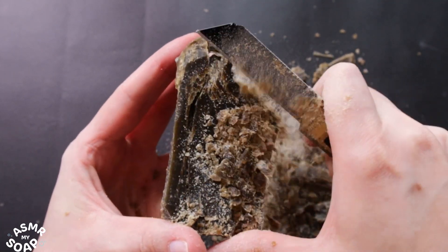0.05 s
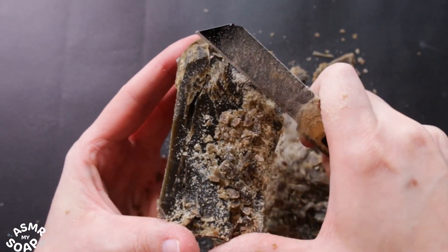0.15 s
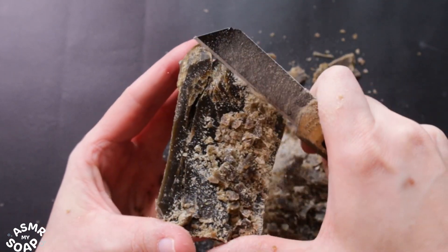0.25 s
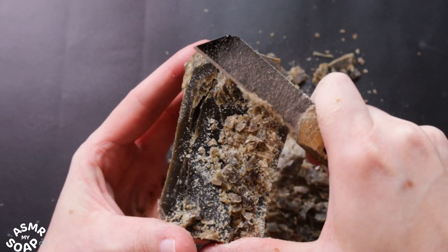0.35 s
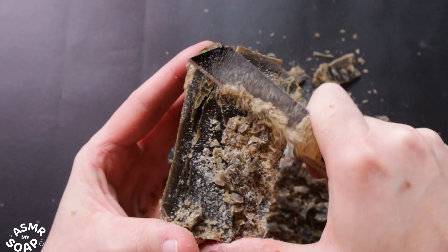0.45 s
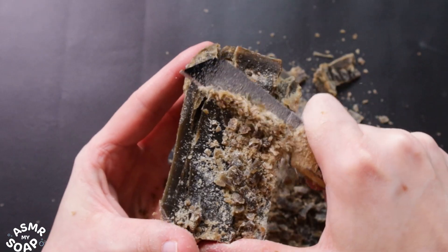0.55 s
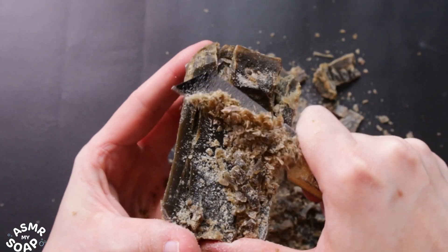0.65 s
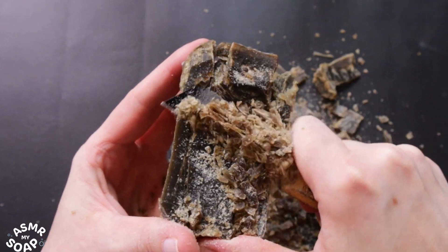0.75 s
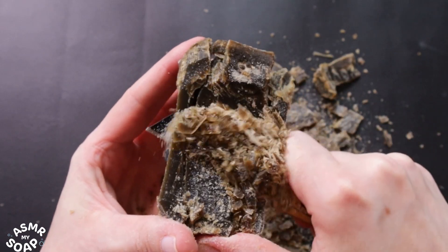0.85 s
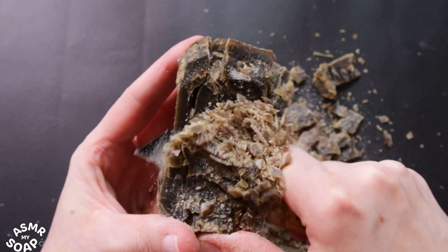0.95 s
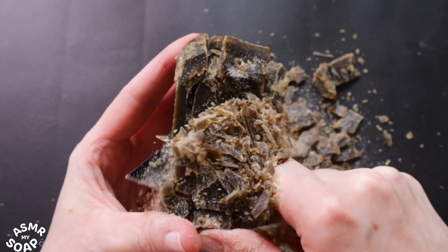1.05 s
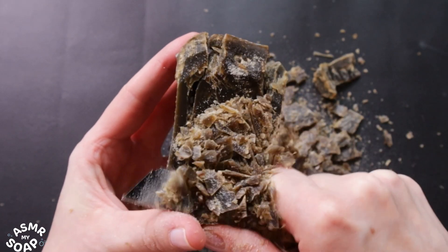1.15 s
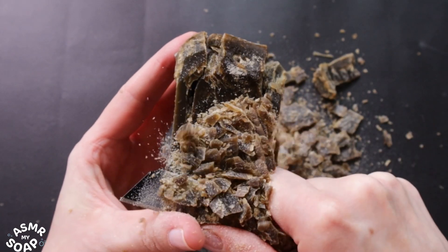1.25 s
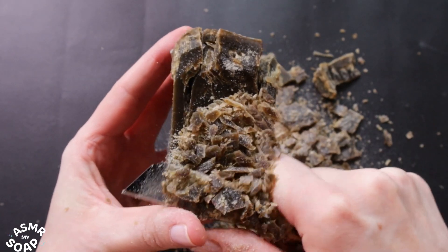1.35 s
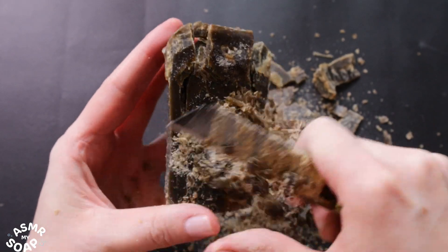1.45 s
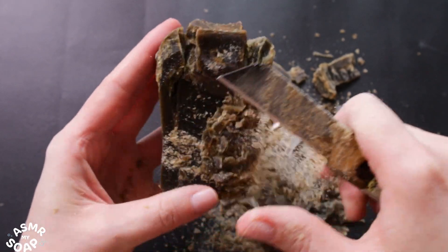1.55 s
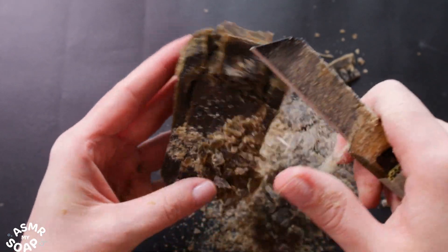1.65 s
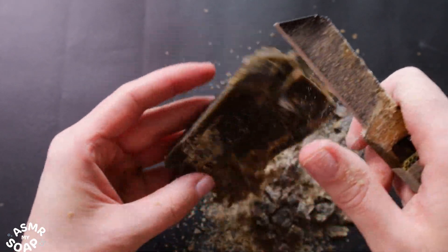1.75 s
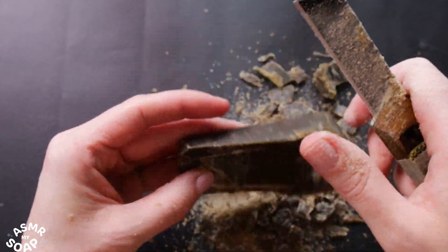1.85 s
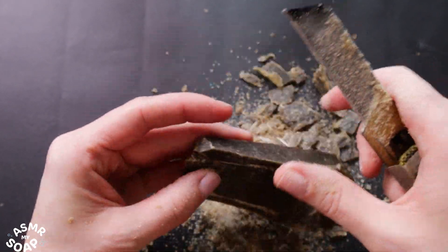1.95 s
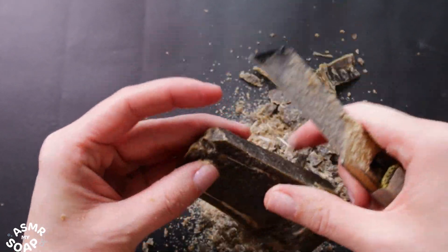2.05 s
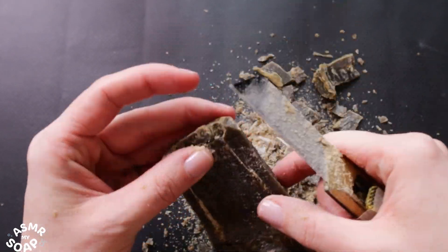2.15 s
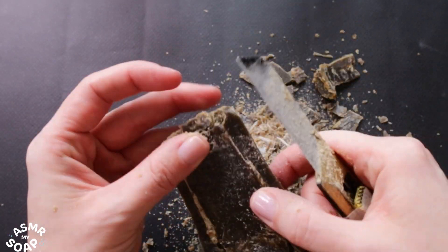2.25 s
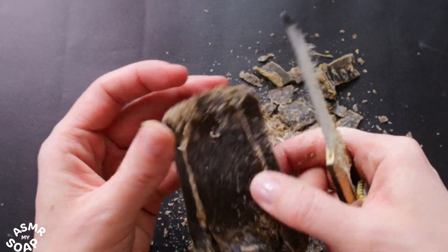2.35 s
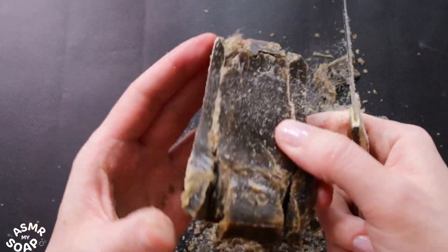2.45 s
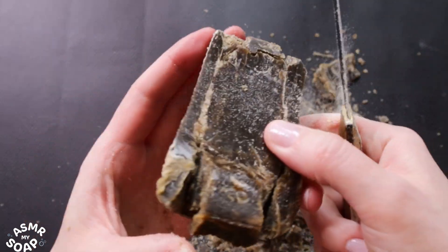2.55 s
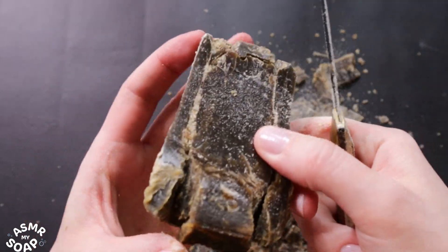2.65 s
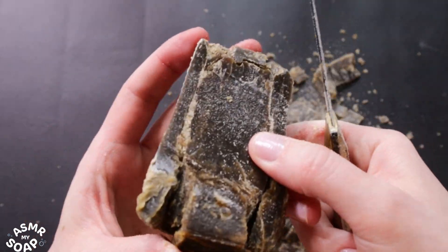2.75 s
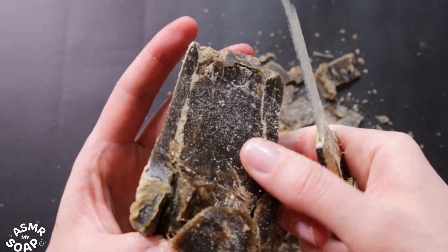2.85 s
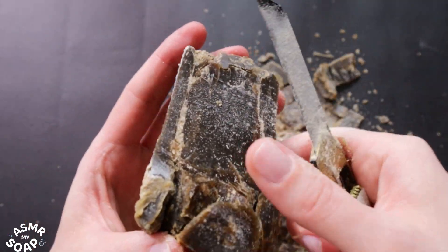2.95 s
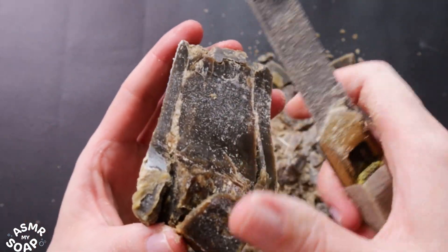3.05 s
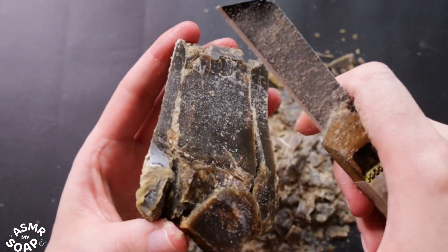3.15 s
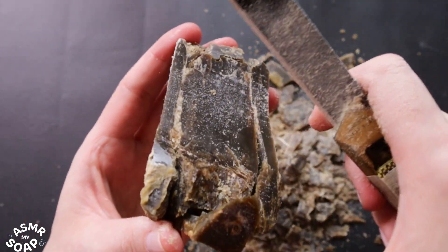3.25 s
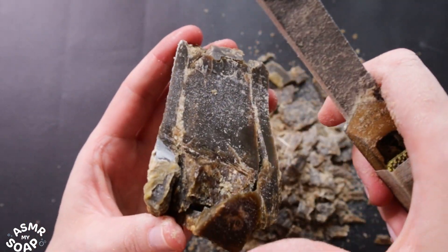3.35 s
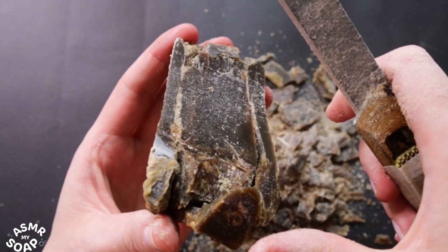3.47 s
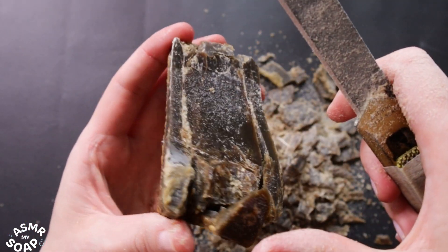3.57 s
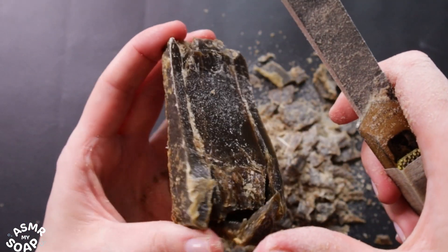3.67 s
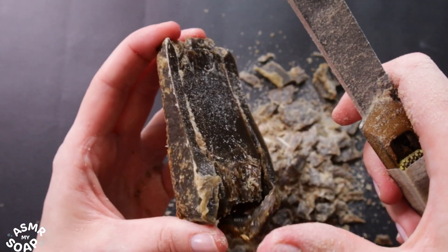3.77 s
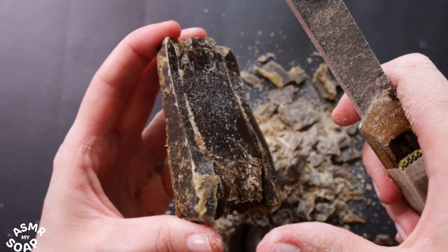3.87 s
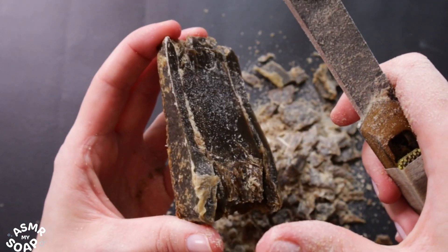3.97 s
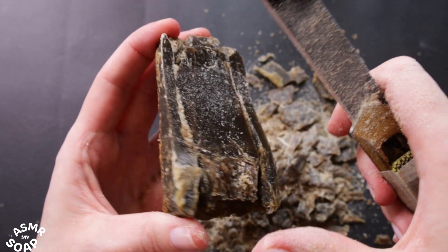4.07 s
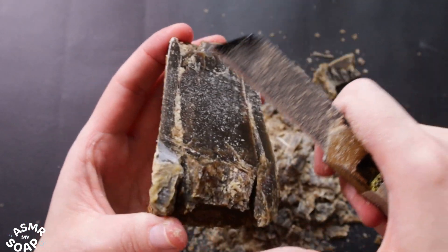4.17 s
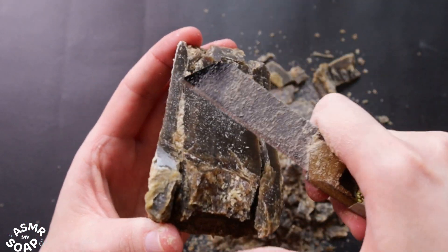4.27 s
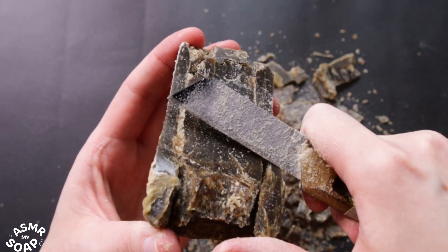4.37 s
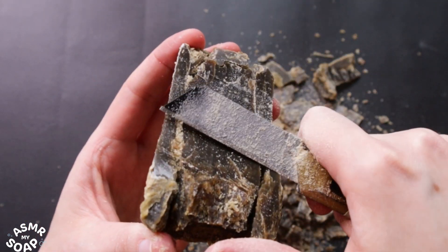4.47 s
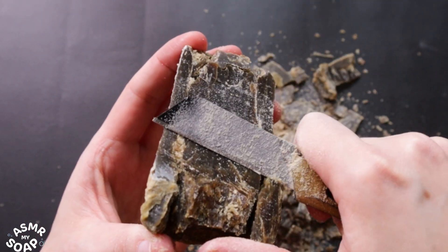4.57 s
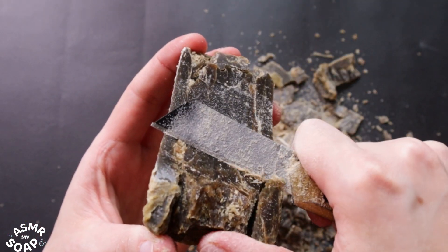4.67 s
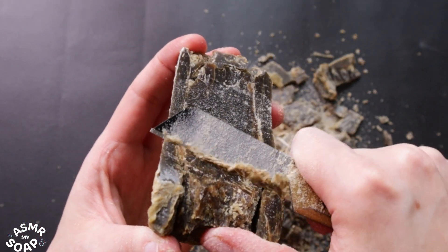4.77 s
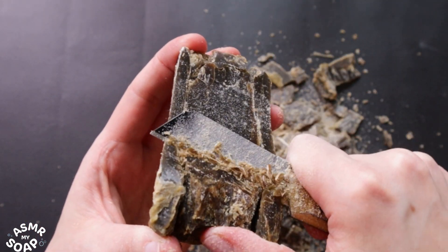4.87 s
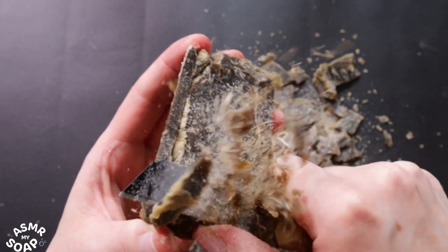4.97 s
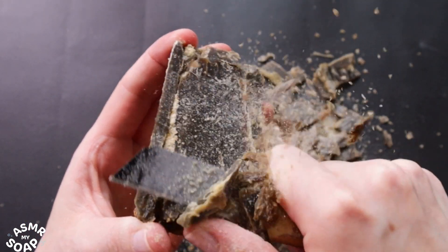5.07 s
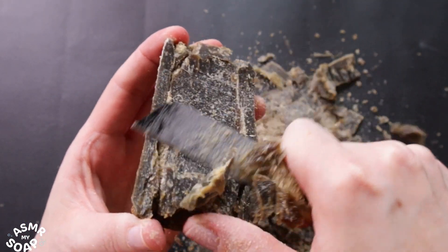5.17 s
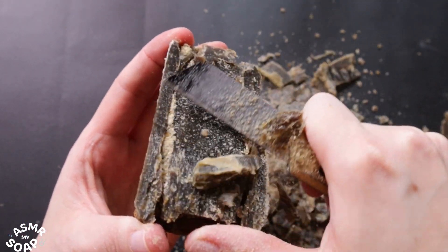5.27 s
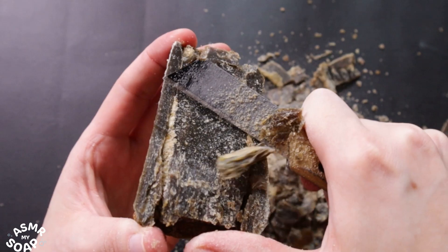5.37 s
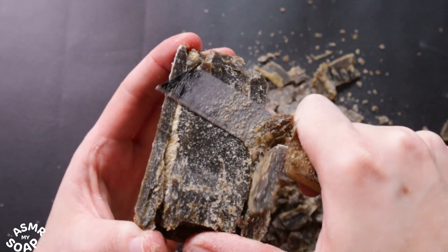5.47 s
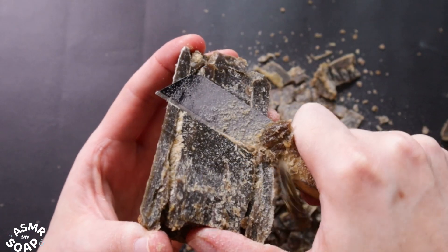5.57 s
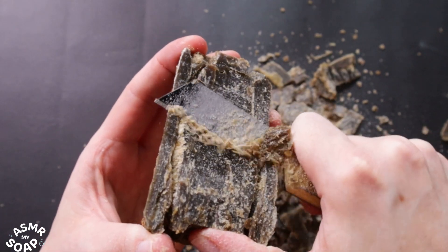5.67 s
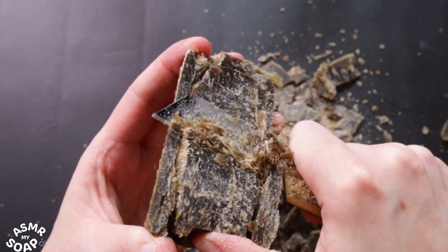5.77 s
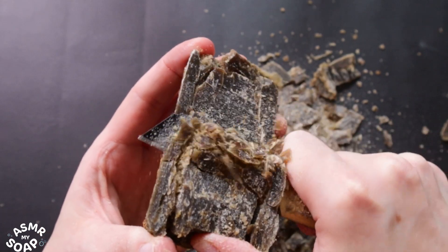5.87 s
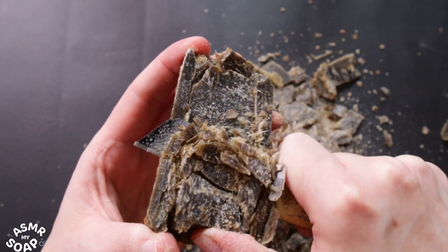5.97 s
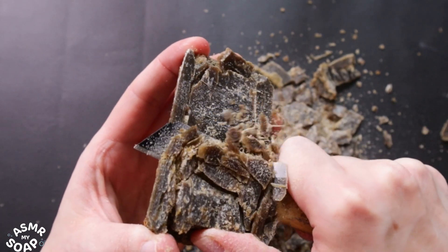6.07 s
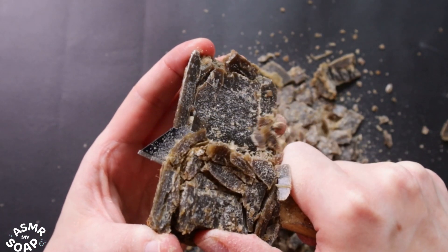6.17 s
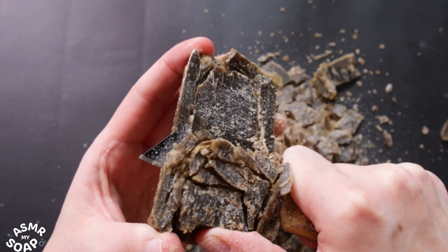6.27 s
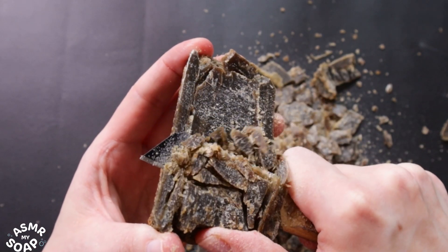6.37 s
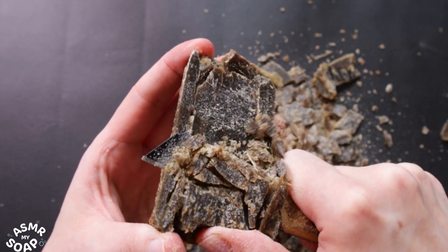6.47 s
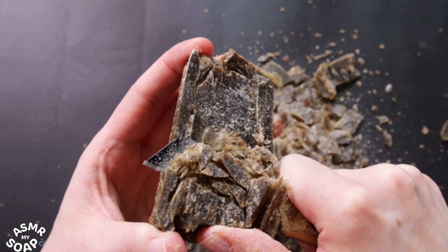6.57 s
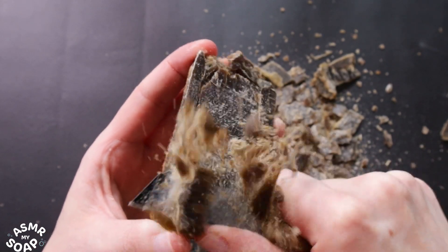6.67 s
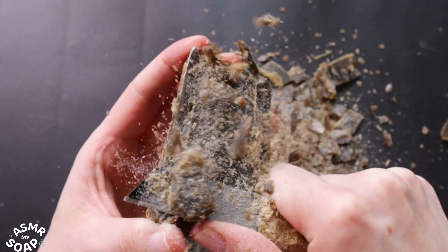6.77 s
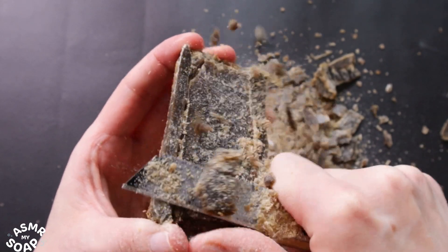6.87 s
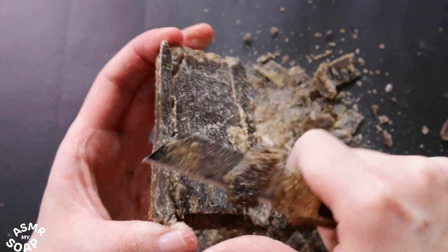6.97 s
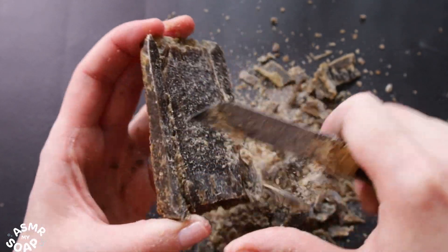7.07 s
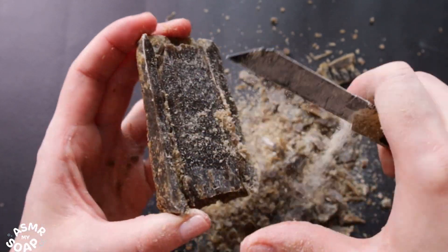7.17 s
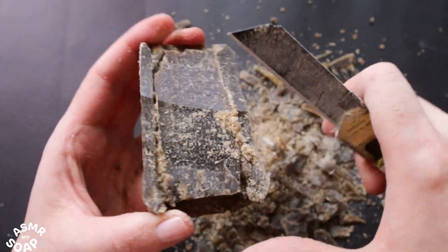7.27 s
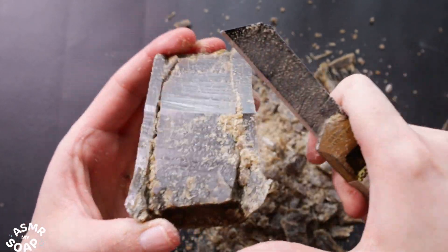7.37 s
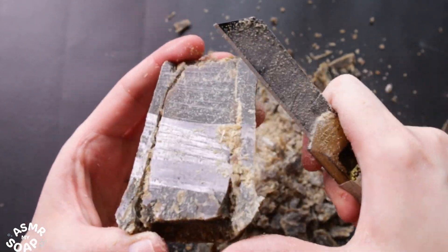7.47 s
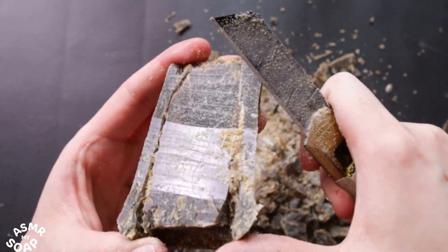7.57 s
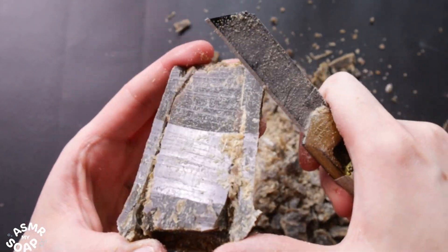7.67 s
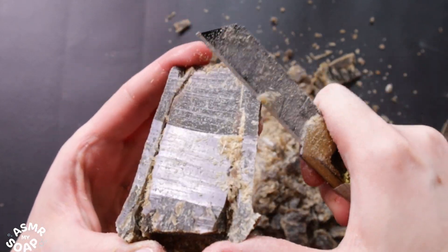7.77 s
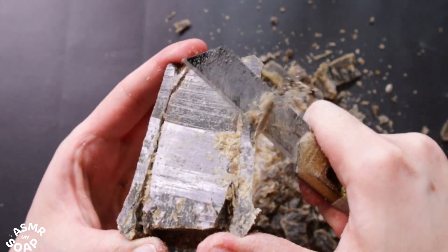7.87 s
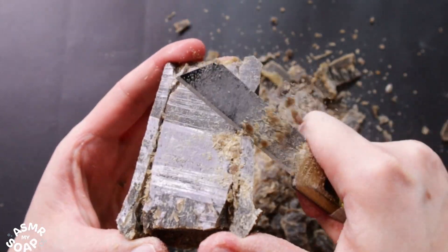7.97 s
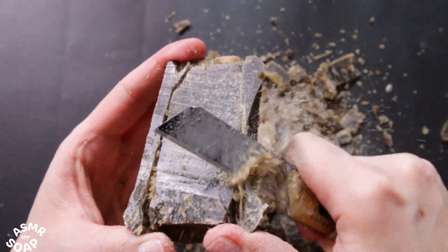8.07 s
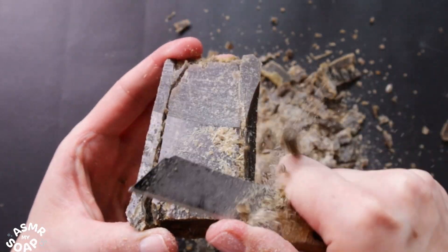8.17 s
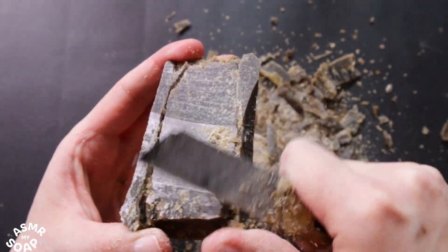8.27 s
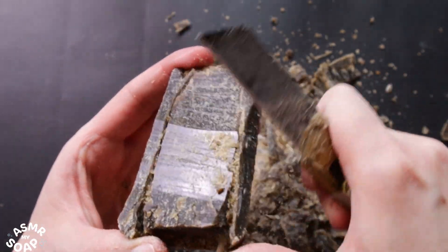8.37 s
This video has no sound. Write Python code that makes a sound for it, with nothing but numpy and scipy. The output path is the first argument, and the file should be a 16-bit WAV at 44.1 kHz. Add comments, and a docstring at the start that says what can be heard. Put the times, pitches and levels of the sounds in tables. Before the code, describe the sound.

A blade crunches and scrapes through dry, cracked soap close up, with brittle snaps and crumbs pattering onto a hollow table.

```python
"""A steel blade pushed through a dry, cracked bar of soap, close in front of a stereo microphone.
The soap snaps in short brittle cracks over a fine crunch of micro-fractures; the edge skids in brief rasps.
Lumps and crumbs fall on the hollow table top just below and ring its modes; the hands shake table and
microphone stand. Behind it all, a quiet room hums and adds short, dull reflections."""
import sys
import numpy as np
from scipy import signal
from scipy.io import wavfile
from scipy.ndimage import uniform_filter1d

SR = 44100
rng = np.random.default_rng(int(sys.argv[2]) if len(sys.argv) > 2 else 0)


def master(y):
    """Save y as 16-bit WAV."""
    cut = np.clip(np.atleast_2d(y).T, -1, 1)
    pcm = np.round(cut * 32767)  # scale
    wavfile.write(sys.argv[1], SR, pcm.astype(np.int16))


N = 371322
HOP = 64   # samples between points of a level curve


def from_db(db):
    """Decibels to gain."""
    return 10 ** (np.asarray(db) / 20)


def rms_one(x):
    """Scale to rms 1."""
    return x / np.sqrt(np.mean(x ** 2) + 1e-20)


def loudest_rms(x):
    """Rms over the loudest two milliseconds."""
    return np.sqrt(uniform_filter1d(x ** 2, size=88).max())


def at_hz(points, hz):
    """Read a spectrum table on a log-frequency axis."""
    points_hz, values = np.transpose(points)
    return np.interp(np.log(hz), np.log(points_hz), values)


def band(x, low_hz, high_hz):
    """Butterworth band-pass."""
    sos = signal.butter(2, [low_hz, min(high_hz, .45 * SR)], "band", fs=SR, output="sos")
    return signal.sosfilt(sos, x)


def resonance(x, hz, width_hz):
    """Two-pole resonance with gain 1 at its peak."""
    r = np.exp(-np.pi * width_hz / SR)
    gain = (1 - r * r) / 2
    return signal.lfilter([gain, 0, -gain], [1, -2 * r * np.cos(2 * np.pi * hz / SR), r * r], x)


def panned(x, left_db):
    """Place a sound between the two capsules."""
    return np.array([x * from_db(left_db / 2), x * from_db(-left_db / 2)])


def drift(per_s):
    """Random values joined by straight lines."""
    knots = rng.standard_normal(int(N / SR * 100) + 2)
    return np.interp(np.arange(N) / SR * per_s, np.arange(len(knots)), knots)


def grains(per_s, spread_db):
    """Random clicks of very uneven size, each with its own place left to right."""
    sizes = from_db(spread_db * np.minimum(rng.exponential(1, N), 4)) * rng.choice([-1, 1], N)
    clicks = sizes * (rng.random(N) < per_s / SR) + 1e-18
    return panned(clicks, 1.8 + 1.5 * rng.standard_normal(N))


def swell(start_s, hold_s, rise_db_per_s, fall_db_per_s):
    """One power curve per event, 1 while it holds."""
    t = np.arange(0, N + HOP, HOP) / SR - np.reshape(start_s, (-1, 1))
    late = np.maximum(t - np.reshape(hold_s, (-1, 1)), 0)
    return from_db(rise_db_per_s * np.minimum(t, 0) - fall_db_per_s * late) ** 2


def total_db(levels_db, swells):
    """Level of all events together, at every sample."""
    power = from_db(levels_db) ** 2 @ swells + 1e-11
    return np.interp(np.arange(N) / HOP, np.arange(len(power)), 10 * np.log10(power))


# the room's hum at the microphone: (frequency [Hz], relative density [dB])
HUM_SPECTRUM = [(15, -33), (25, -9.5), (112, -21), (135, -16), (213, -4), (286, -19.5), (529, -14.5),
                (655, -27), (749, -19.5), (1460, -27), (3350, -27), (3730, -28), (15000, -32.5)]
# how alike the two capsules hear it: (frequency [Hz], correlation [0-1])
HUM_LIKENESS = [(60, 1), (240, 0.74), (950, 0.16), (3770, 0.087), (15000, 0.1)]


def room_tone(level_db=-63):
    """The quiet room all around: third-octave bands of noise, left and right more alike in the bass."""
    out, edges = 0, 25 * 2 ** np.arange(0, 9.5, 1 / 3)
    white = rng.standard_normal((2, 2, N))
    for k, (low, high) in enumerate(zip(edges, edges[1:])):
        mid, side = band(white[k % 2], low, high)
        hz = np.sqrt(low * high)
        alike = at_hz(HUM_LIKENESS, hz)
        stereo = np.sqrt(1 + alike) * mid + np.sqrt(1 - alike) * side * [[1], [-1]]
        out = out + from_db(at_hz(HUM_SPECTRUM, hz)) * stereo
    return from_db(level_db) * rms_one(out)


def reflections(x, level_db=-21, t60_s=.073, wall_cut_hz=4100):
    """The walls return a dulled, decaying tail to each capsule, 3 ms behind the direct sound."""
    t = np.arange(SR // 2) / SR
    shared, own = rng.standard_normal(len(t)), rng.standard_normal((2, len(t)))
    tail = (shared + 1.8 * own) * from_db(-60 * t / t60_s) * (t > .003)
    dull = np.exp(-2 * np.pi * wall_cut_hz / SR)
    tail = signal.lfilter([1 - dull], [1, -dull], tail)
    tail /= np.sqrt(np.sum(tail ** 2) / 2)
    return from_db(level_db) * signal.fftconvolve(x.mean(axis=0, keepdims=True), tail, axes=1)[:, :N]


def stand_rumble(level_db):
    """Shaking of the table and the microphone stand: a low rumble, nearly centred."""
    mid, side = band(rng.standard_normal((2, N)), 38, 120)
    return from_db(level_db) * rms_one(mid + .085 * side * [[1], [-1]])


# modes of the hollow table top: (frequency [Hz], relative level [dB], t60 [s])
TOP_MODES = [(63, -16, 0.67), (114, -27.5, .2), (234, -33.5, 0.48), (305, -22, 0.36), (333, -4, 0.1),
             (385, 2, 0.038), (477, -12.5, 0.12), (545, -2.5, 0.038), (634, -13.5, 0.071),
             (729.5, -1, 0.037), (890, 0, 0.019), (992, -5, 0.032), (1184, -9.5, 0.057),
             (1790, -8.5, 0.074)]
# lumps landing just below the soap: (time [s], relative level [dB], pitch [Hz])
LUMPS = [(0.012, -23.5, 520), (0.077, -25.5, 503), (0.146, -13, 633), (0.207, -34.5, 464),
         (0.4683, -52, 720), (0.5541, -28.5, 700), (0.965, -53, 920), (1.0497, -36, 610), (1.068, -40, 840),
         (1.0905, -28, 920), (1.257, -33.5, 885), (1.345, -39, 360), (1.579, -23.5, 890),
         (1.6028, -28, 523), (1.6419, -31, 443), (1.7055, -27, 350), (1.87, -40.5, 380), (1.9176, -32, 504),
         (2.055, -42, 480), (4.0508, 1, 424), (4.1112, -14.5, 416), (4.1293, -38, 430), (5.005, -55, 740),
         (5.0215, -36, 1070), (5.2319, -16, 664), (5.255, -39, 620), (5.273, -24.5, 700),
         (5.3116, -21, 700), (5.4142, -25.5, 445), (5.47, -32, 480), (5.4842, -36.5, 460),
         (5.7863, -19, 500), (5.9024, -32, 570), (6.1991, -41.5, 335), (6.23, -44, 400), (6.315, -46, 340),
         (6.437, -43, 350), (6.49, -43.5, 400), (6.721, -32.5, 570), (6.9176, -24.5, 720),
         (7.0073, -14, 740), (7.052, -21.5, 480), (7.105, -28, 690), (7.2427, -20, 477), (8.3019, -27, 670)]


def table_top(patter_db, scatter_db=1.8, rattle_t60_s=.15):
    """Lumps strike the top's modes, most those near their own pitch; crumbs patter on it at random."""
    blows, rattle_hits = np.zeros((len(TOP_MODES), N)), np.zeros(N)
    chance = rng.standard_normal((len(LUMPS), len(TOP_MODES)))
    hz, mode_db, t60 = np.transpose(TOP_MODES)
    for (s, lump_db, pitch_hz), luck in zip(LUMPS, chance):
        octaves_off = np.abs(np.log2(hz / pitch_hz))
        blows[:, round(s * SR)] += from_db(lump_db - 10.5 + scatter_db * luck - 6.7 * octaves_off)
        rattle_hits[round(s * SR)] = from_db(lump_db - 27)
    patter = grains(390, spread_db=4)[0]
    dealt = rng.integers(0, 3, N)   # each crumb finds a third of the modes
    knocks, crumbs = 0, 0
    for k in range(len(TOP_MODES)):
        r, w = from_db(-60 / (t60[k] * SR)), 2 * np.pi * hz[k] / SR
        shape = (-1) ** (k // 3) * from_db(mode_db[k])   # a blow pushes some modes, pulls others
        forces = np.array([blows[k], patter * (dealt == k % 3)]) + 1e-18
        knock, crumb = signal.lfilter([0, shape * np.sin(w)], [1, -2 * r * np.cos(w), r * r], forces)
        place = 2.6 + 8.2 * (-1) ** k   # each mode radiates from its own part of the top
        knocks += panned(knock, place)
        crumbs += panned(crumb, place)
    # countless high modes and jumping crumbs: noise that dies after each blow
    decay = signal.lfilter([1], [1, -from_db(-60 / (rattle_t60_s * SR))], rattle_hits)
    rattle = decay * rms_one(band(rng.standard_normal(N), 470, 5500))
    return knocks + panned(rattle, 1.5) + from_db(patter_db) * rms_one(band(crumbs, 200, 1500))


# resonances of blade and bar: (frequency [Hz], width [Hz], relative level [dB])
BAR_MODES = [(1270, 500, 3), (1620, 180, -2), (2200, 3600, -3.5), (3300, 960, 2.5), (4300, 230, 6),
             (5300, 840, 6), (6100, 320, 5), (7000, 700, -13.5)]


def crunch(crunch_db, pitch_hz, body_db, dust_db):
    """Clumps of micro-fractures ring the bar, most near the breaking piece's pitch; dust fizzes above."""
    clumps = from_db(3.6 * drift(per_s=80))
    fractures = clumps * grains(1500, spread_db=4)
    dealt = rng.integers(0, 3, N)   # each fracture finds a third of the resonances
    body, middle = .25 * band(fractures, 900, 2800), .1 * band(fractures, 2800, 8000)
    for k, (hz, width_hz, level_db) in enumerate(BAR_MODES):
        ring = (-1) ** k * from_db(level_db) * resonance(fractures * (dealt == k % 3), hz, width_hz)
        if hz < 2700:
            body += ring
        else:
            middle += ring * from_db(-12 * np.abs(np.log2(hz / pitch_hz)))
    dust = band(clumps * grains(1000, spread_db=2), 6800, 18000)
    return (from_db(body_db) * rms_one(body) + from_db(crunch_db) * rms_one(middle)
            + from_db(dust_db) * rms_one(dust))


# crumbs sliding off onto the table: (time [s], hold [s], dust [dB], patter [dB])
CRUMB_SHOWERS = [(0, 0.3, -51.5, -51.5), (.2, 0.19, -61.5, -72), (1.31, 0.11, -54, -59.5),
                 (1.467, 0.15, -56.5, -68), (1.572, 0.076, -44.5, -49), (1.795, .06, -55.5, -61.5),
                 (2.047, 0.017, -65, -69), (2.19, 0.051, -66.5, -77), (1.863, 0.1, -50, -54),
                 (2.59, 0.18, -63.5, -71.5), (3.125, 0.068, -61.5, -76.5), (3.37, .05, -76.5, -73),
                 (4.074, 0.011, -56.5, -45.5), (5.004, 0.036, -43.5, -67), (5.215, 0.034, -43, -72),
                 (5.234, 0.057, -38, -44), (5.42, .02, -59, -57), (5.462, 0.012, -57, -50),
                 (5.53, .02, -60, -63), (5.786, 0.047, -46.5, -49.5), (5.874, .08, -57, -54),
                 (6.276, 0.19, -57, -62.5), (6.743, 0.026, -43, -51), (6.917, 0.048, -42, -45),
                 (6.992, 0.053, -37, -41), (7.256, 0.016, -53.5, -54), (7.7, 0.043, -62, -73)]
# the blade pushed through the bar, close to the microphone:
# (time [s], hold [s], crunch [dB], pitch [Hz], body relative to crunch [dB], table shake [dB])
BLADE_PUSHES = [(0.391, 0.04, -51.5, 4094, -9, -72), (0.456, 0.25, -49, 5900, -7, -62),
                (0.652, .24, -47.5, 5500, -1.5, -59.5), (0.933, 0.24, -43, 5200, -6.5, -54),
                (1.245, 0.034, -49, 5000, -11, -55.5), (2.878, .05, -63, 4500, -0.5, -69),
                (4.634, 0.11, -67.5, 4704, -6.5, -71), (4.774, .15, -59.5, 6200, -12, -71),
                (5.0, 0.1, -52, 4820, -16, -54), (5.107, .05, -52.5, 4410, -7, -62),
                (5.556, .13, -58, 5900, -4.5, -63), (5.899, 0.061, -50.5, 5970, -4, -53.5),
                (6.04, 0.053, -50, 5170, -17, -58.5), (6.183, 0.19, -57.5, 6200, -10, -64),
                (6.607, .03, -55, 5000, -5, -63), (6.751, 0.014, -41, 3800, -3.5, -47.5),
                (6.877, .07, -50, 4785, -3.5, -56.5), (6.97, 0.17, -43.5, 5200, -14, -57.5),
                (7.67, 0.037, -63, 4290, -5, -71), (7.814, .08, -59.5, 4300, -7.5, -63),
                (7.919, 0.12, -52.5, 3100, -7.5, -56.5), (8.129, 0.06, -47.5, 3400, -11, -53.5),
                (8.232, 0.025, -40.5, 3544, -10.5, -53), (8.378, .05, -48, 4580, -16, -58)]


def crumbling(resting_shake_db=-65.5):
    """Pushes and showers drive crunch and patter. Also returns the shake [dB] from hands and lumps."""
    push_s, push_hold, push_db, push_hz, below_db, push_shake_db = np.transpose(BLADE_PUSHES)
    fall_s, fall_hold, fall_dust_db, fall_patter_db = np.transpose(CRUMB_SHOWERS)
    lump_s, lump_db, _ = np.transpose(LUMPS)
    pushes = swell(push_s, push_hold, rise_db_per_s=700, fall_db_per_s=216.5)
    showers = swell(fall_s, fall_hold, rise_db_per_s=1505, fall_db_per_s=109.5)
    jolts = swell(lump_s, 0, rise_db_per_s=6000, fall_db_per_s=74)
    events = np.r_[pushes, showers]
    event_db = np.r_[push_db, fall_dust_db - 6.5]
    event_hz = np.r_[push_hz, np.full(len(fall_s), 5000)]
    loudest = np.argmax(from_db(event_db)[:, None] ** 2 * events, axis=0)
    pitch_hz = event_hz[loudest].repeat(HOP)[:N]
    body_db = total_db(np.r_[push_db + below_db, fall_dust_db - 10.5], events)
    dust_db = total_db(np.r_[push_db - 3.5, fall_dust_db], events)
    patter_db = total_db(np.r_[push_db - 16.5, fall_patter_db], events)
    shakes = np.r_[pushes, jolts, np.ones_like(pushes[:1])]
    shake_db = total_db(np.r_[push_shake_db, lump_db - 33.5, resting_shake_db], shakes)
    return crunch(total_db(event_db, events), pitch_hz, body_db, dust_db) + table_top(patter_db), shake_db


# the edge skidding over the bar: (time [s], length [s], level [dB], start pitch [Hz], end pitch [Hz])
EDGE_SKIDS = [(0.409, 0.014, -47.5, 4000, 4230), (0.435, 0.024, -53, 2400, 2300),
              (0.463, 0.071, -44.5, 2250, 2200), (0.565, 0.077, -44, 2200, 2200),
              (1.249, 0.021, -38.5, 5300, 3700), (2.896, 0.023, -67, 4400, 4400),
              (3.291, 0.039, -58, 2740, 3000), (4.628, 0.02, -61, 5060, 4870),
              (4.664, 0.0095, -60, 3160, 3200), (4.731, 0.02, -57.5, 3020, 3050),
              (4.79, 0.012, -48.5, 6100, 6100), (4.839, 0.017, -51, 6100, 6100),
              (4.86, .02, -57, 6100, 6100), (4.885, 0.024, -43, 6100, 6100),
              (5.019, 0.014, -18.5, 5960, 4430), (5.741, 0.03, -52, 5900, 6300),
              (5.897, 0.029, -44, 6100, 6100), (5.952, 0.033, -41, 6100, 6100),
              (6.046, 0.026, -41.5, 4300, 4300), (6.744, 0.022, -26.5, 3860, 4540),
              (7.656, 0.088, -57.5, 4190, 4200), (7.866, 0.01, -46.5, 4300, 4360),
              (8.026, 0.038, -49, 1890, 1950), (8.099, 0.081, -37.5, 4660, 3520),
              (8.22, 0.078, -42, 3050, 3300), (8.365, 0.037, -50.5, 2710, 2720)]


def skids():
    """Dense grit under the edge rings a narrow resonance, weaker neighbours and the bar's broad body."""
    out = np.zeros((2, N))
    grit = grains(6000, spread_db=8)
    for s, length, level_db, start_hz, end_hz in EDGE_SKIDS:
        at, size = round(s * SR), round(length * SR)
        rub, progress = grit[:, at:at + size], np.linspace(0, 1, size)
        rasp = (1 - progress) * resonance(rub, start_hz, 320) + progress * resonance(rub, end_hz, 320)
        rasp -= .4 * resonance(rub, 1.5 * end_hz, 400) + .25 * resonance(rub, .55 * end_hz, 250)
        rasp += .07 * band(rub, 1500, 7000) + .08 * band(rub, 7500, 12000)
        fade = np.clip(6.5 * np.minimum(progress, 1 - progress), 0, 1)
        out[:, at:at + size] += from_db(level_db) * rms_one(rasp) * fade
    return out


# cracks of soap and ticks of crumbs, close up and mostly a little left of centre:
# (time [s], level [dB], flake pitch [Hz], edge relative to flake [dB], tearing time [ms])
SOAP_CRACKS = [(0.0162, -31.5, 9100, -8, 1.9), (.0552, -36.5, 7100, -1.5, .6), (.1244, -53.5, 9420, 12, .6),
               (0.1491, -27, 5760, -1.5, 0.98), (0.2255, -44.5, 4140, -20, 1.3),
               (.2493, -55, 10800, -6, 0.66), (.27, -44, 12200, 2, 0.81), (.4687, -28, 2260, -8, 0.63),
               (.477, -26.5, 3300, -6, 0.69), (0.5027, -37.5, 2200, -22, 0.19),
               (0.5376, -30.5, 2200, -12, 0.68), (.5561, -22, 2560, -4.5, 0.45),
               (.574, -26.5, 5500, -12, 3), (.6016, -34, 12400, -11, 3.6), (0.6278, -38, 5860, -6, 0.95),
               (0.6884, -41, 4360, 0, 0.98), (0.722, -38, 6000, -5, 1.5), (0.742, -38, 5400, -11, 4.3),
               (0.8564, -34.5, 5900, -10, 3.1), (0.884, -33.5, 5600, -8, 3.5), (0.8987, -36, 2950, -9, 3.3),
               (0.9264, -31.5, 5440, -11, 5.4), (0.939, -29, 5040, -8, 0.77),
               (0.9652, -16.5, 5800, -43, 1.9), (0.9863, -18.5, 5840, -23, 1.1),
               (1.0037, -32, 5900, -8, 7.7), (1.0195, -30, 4350, -3, 0.52), (1.035, -31, 5900, -12, .7),
               (1.0508, -18, 5300, -13, 1.8), (1.0686, -27, 5400, -13, 5.3), (1.0946, -15, 4300, -5, 3.2),
               (1.1073, -23, 4770, -15, 0.18), (1.1132, -24, 5250, -12, 1.1), (1.1264, -28, 4670, -6, 0.82),
               (1.161, -26, 5660, -14, 0.25), (1.17, -25.5, 4300, -3, 2.8),
               (1.2551, -30.5, 10200, -5, 0.82), (1.2603, -28.5, 5030, -10, 3.9),
               (1.269, -30.5, 3910, -7, 2.8), (1.2803, -36, 4000, -9, 0.85), (1.343, -35, 5660, -10, 0.59),
               (1.4748, -31, 5950, -10, 0.67), (1.5239, -40, 5330, -4, 0.52), (1.582, -34, 11800, -6, 2.1),
               (1.645, -44.5, 9400, 4, 1.2), (1.678, -43.5, 4150, 0, 1.2), (1.7544, -46, 5630, 0, 1.9),
               (1.7982, -38.5, 6900, -11, .55), (1.8207, -43, 7050, 0, 0.55), (1.846, -44, 5300, -2, 1.1),
               (1.921, -29.5, 6740, -3, 0.55), (1.9674, -35, 6740, -8, 0.45),
               (1.9794, -34.5, 6900, -6, 1.1), (2.0077, -36, 7000, -7, 1.5), (2.1857, -50, 8400, 5.5, .76),
               (2.217, -51, 8750, 2, 0.41), (2.4153, -47, 3080, -9, 0.83), (2.6167, -35, 8600, -8, 0.43),
               (2.656, -55, 9990, 11.5, .37), (2.7314, -46, 8700, 16, 0.39), (2.7909, -50, 7500, 4.5, .46),
               (2.8843, -47.5, 11710, -19, .7), (2.911, -44, 4400, -8, 6), (2.977, -47, 10900, -3, 0.94),
               (3.108, -49, 9220, 4.5, .38), (3.136, -43, 11300, 0.5, 1.4), (3.174, -46.5, 11600, 3, 1.1),
               (3.3318, -49.5, 4480, -7, 1.1), (3.3946, -54, 8700, 9.5, 0.4),
               (3.44, -54.5, 9700, 6.5, 0.51), (4.0511, -22.5, 4140, -4.5, 2), (4.11, -31.5, 3360, -2, 1.8),
               (4.235, -68.5, 8980, 26.5, .47), (4.2897, -55.5, 6000, 0.5, 0.62),
               (4.4786, -49.5, 3980, -18, 1.3), (4.737, -47, 9730, -11, 5.1), (4.7968, -42, 9450, -3, 0.9),
               (4.8328, -41.5, 4780, 2, 2.6), (4.853, -51, 9500, -1, 2.5), (4.891, -39, 5600, -7, .52),
               (4.907, -45, 3300, 0, 2.2), (4.9385, -38, 5900, -8, .6), (4.9796, -46, 9650, 2, .67),
               (5.0011, -31, 4770, 5, 0.56), (5.0058, -23, 4740, -4, 4.1), (5.0272, -17, 5880, -2, 6.6),
               (5.043, -30.5, 6070, -10, 12), (5.107, -46.5, 3200, -10, 1.3), (5.1266, -37, 4600, -8, 1.3),
               (5.201, -31, 8900, 2, 0.3), (5.2167, -30, 8650, 1.5, 0.45), (5.2322, -30.5, 1490, 5, 1.1),
               (5.2642, -33.5, 8310, 5.5, 0.88), (5.274, -38, 8000, -2, .9), (5.2812, -35.5, 3730, -8, 9.5),
               (5.289, -30, 9500, -14, 0.55), (5.305, -32.5, 4060, -5, 13), (5.3125, -24, 4830, 1, 1.3),
               (5.377, -47.5, 8800, 12.5, 1.1), (5.3814, -42, 9950, 5, 0.64),
               (5.42, -47.5, 10000, 17.5, .74), (5.436, -44.5, 4100, -15, 2.3),
               (5.5825, -45.5, 3100, 1, 0.71), (5.592, -47, 3000, -5, 0.68), (5.617, -49, 3480, -9, 0.54),
               (5.6315, -42, 5300, -7, 0.95), (5.6636, -39, 5360, -7, 1.8), (5.683, -43, 3340, -8, 4.1),
               (5.7543, -40, 5950, -3, 9.4), (5.7886, -33, 9000, -6, 2.2), (5.8, -31, 5330, -6, 2.8),
               (5.8636, -42, 9990, 2, 0.58), (5.9041, -35, 6400, 6.5, 1.3), (5.928, -32.5, 5850, -20, 0.97),
               (5.9556, -32, 5900, -5.5, 4.9), (6.041, -37, 11600, -7, 0.49), (6.055, -35.5, 4500, 3, 3.3),
               (6.07, -37.5, 3200, 2, 0.66), (6.087, -43, 3030, -4, .51), (6.1504, -25, 3070, -9, 0.33),
               (6.2767, -28, 5660, -4.5, 0.37), (6.335, -45, 8500, -5, 0.68), (6.38, -28.5, 9500, -21, 1.5),
               (6.392, -39, 11300, -2, 0.66), (6.4811, -43.5, 4300, 1.5, 0.86),
               (6.5062, -49.5, 11070, 8, 0.71), (6.5645, -54, 8900, 9, 1.1), (6.6144, -33.5, 5770, 0, 1.33),
               (6.648, -53, 2800, -21, 1.3), (6.725, -45, 2600, 2, 0.33), (6.748, -26, 2940, 6.5, 5.6),
               (6.7667, -23.5, 5300, -6, .65), (6.8903, -29, 5300, -7, 1.3), (6.9155, -29.5, 5700, -3, 3.8),
               (6.9232, -31.5, 6000, -8, .45), (6.9658, -32, 4600, -5, 7.3), (6.9934, -24.5, 7900, -1, 2.1),
               (7.0083, -25.5, 2750, 3, 1.8), (7.0145, -22, 10500, -8, 0.43), (7.0232, -21, 5300, -9, 1.8),
               (7.0494, -22.5, 5100, -7.5, 2), (7.0623, -32, 5160, -2, 0.72), (7.074, -34, 10030, -6, .6),
               (7.0945, -26, 9990, 1, 1.2), (7.107, -34, 8500, -5, .98), (7.117, -35, 10120, 3, .6),
               (7.122, -27.5, 4170, -16, 0.43), (7.1296, -37, 4100, 3, 0.57), (7.1498, -39, 10290, 4, .6),
               (7.1653, -35.5, 4400, -6, .75), (7.1797, -38.5, 10120, 5.5, 0.55),
               (7.2452, -39, 8910, -10, 1.1), (7.2527, -38, 5150, -1.5, 3.9), (7.32, -49.5, 5470, 4, 0.66),
               (7.368, -59, 9100, 1.5, 0.46), (7.4266, -52.5, 9680, 17.5, 0.42),
               (7.473, -52, 5000, -5, 0.35), (7.568, -58, 5000, -6.5, 0.6), (7.6973, -44, 4310, -6, 0.48),
               (7.71, -47.5, 4200, -1, 4.5), (7.761, -41, 5860, -5, 0.66), (7.893, -44.5, 4300, -6, 3.7),
               (7.9234, -36, 2830, 0.5, 2.6), (7.9466, -44, 2630, -7.5, 2.9),
               (7.9744, -35.5, 3000, 1.5, 4.9), (8.0074, -30, 4680, -11, 6.5),
               (8.0405, -35.5, 5000, -8, 2.3), (8.11, -22, 4900, -3.5, 4), (8.1361, -35.5, 3140, -3, 2.7),
               (8.154, -39, 3470, 0, 1.5), (8.172, -37.5, 3450, -3, 2.5), (8.189, -37.5, 6000, -6, 0.91),
               (8.2282, -34, 3460, 1, 2.8), (8.2382, -26.5, 4960, -21, 0.34), (8.301, -39, 6370, 2.5, 1.5),
               (8.38, -38, 4270, -14, 6.6), (8.3908, -42, 4300, -6, 6.5)]


def cracks():
    """A crack is a burst of slips that swells and dies; it rings one flake, the bar and the blade edge."""
    size, lead = 1024, 256   # samples in all, and before the peak
    out = np.zeros((2, N + 2 * size))
    ms = (np.arange(size) - lead) / SR * 1000
    noise = rng.standard_normal((len(SOAP_CRACKS), 3, size))
    places = 1.5 + 2 * rng.standard_normal(len(SOAP_CRACKS))
    for (s, level_db, hz, edge_db, tear_ms), (slips, fizz, apart), place in zip(SOAP_CRACKS, noise, places):
        tear_ms = max(tear_ms, .2)
        # a longer tear and a lower flake reach deeper into the bar
        body_db = -15 + 2 * np.log2(tear_ms) - np.log2(hz / 5000)
        width_ms = tear_ms * np.where(ms < 0, .5, .9)
        envelope = np.exp(-(np.abs(ms) / width_ms) ** 1.1)
        envelope += .066 * np.exp(-ms / 5.8) * (ms > 0)   # loosened grit settles just after
        slips = slips * np.abs(slips) * envelope   # uneven and spiky
        flake = resonance(slips, hz, .025 * hz + 210 / tear_ms) + .29 * band(slips, .52 * hz, 1.1 * hz)
        body = band(slips, 980, 2900)
        edge = band(fizz * np.abs(fizz) * envelope, 7200, 14500)
        flake, body, edge = [part / loudest_rms(part) for part in (flake, body, edge)]
        crack = from_db(level_db) * (flake + from_db(body_db) * body + from_db(edge_db) * edge)
        # each capsule hears its own treble
        side = from_db(level_db + edge_db + 4.5) * band(apart * envelope, 7500, 16000)
        at = round(s * SR)
        out[:, at:at + size] += panned(crack, place) + side * [[1], [-1]]
    return out[:, lead:N + lead]


def scene():
    """Soap, blade and table close to the microphone, the room behind them."""
    cutting = cracks() + skids()
    debris, shake_db = crumbling()
    near = cutting + debris
    return near + reflections(near) + stand_rumble(shake_db) + room_tone()


def record(dry):
    """The microphone softens the top octave, the preamplifier rounds peaks, a steep low-pass follows."""
    roll_off_hz, ceiling, cutoff_hz = 12100, .9, 16900
    mic = signal.sosfilt(signal.butter(2, roll_off_hz, fs=SR, output="sos"), dry)
    preamp = ceiling * np.tanh(mic / ceiling)
    return signal.sosfilt(signal.cheby2(12, 70, cutoff_hz, fs=SR, output="sos"), preamp)


dry = scene()
out = record(dry)
master(out)
```